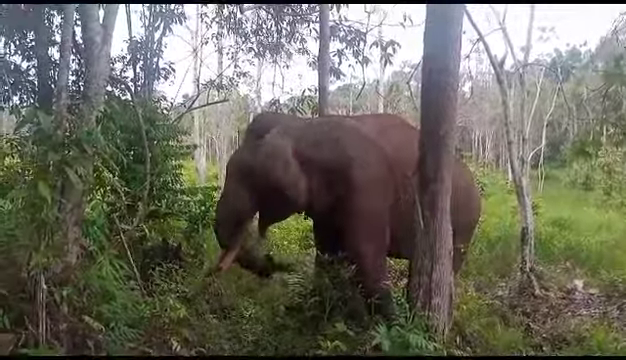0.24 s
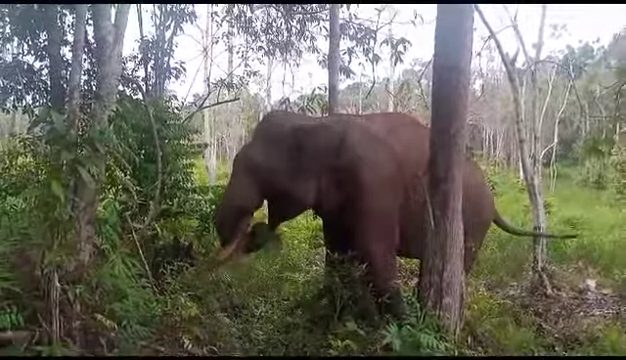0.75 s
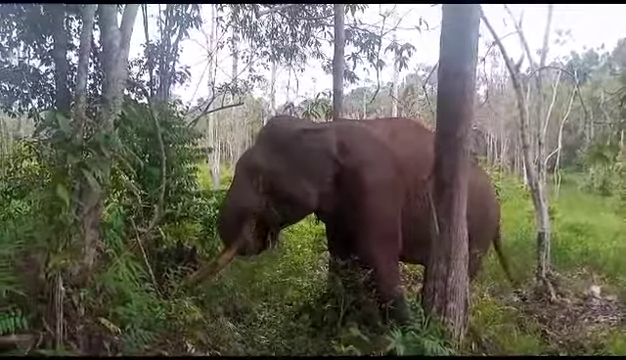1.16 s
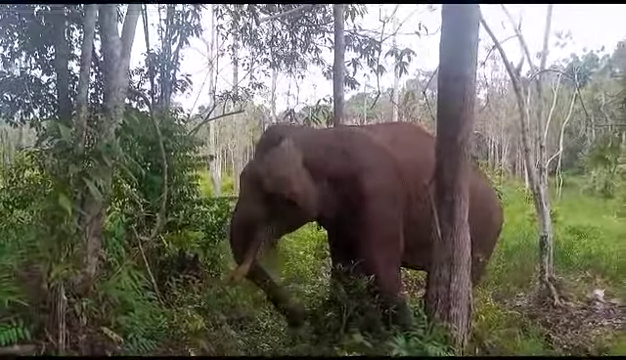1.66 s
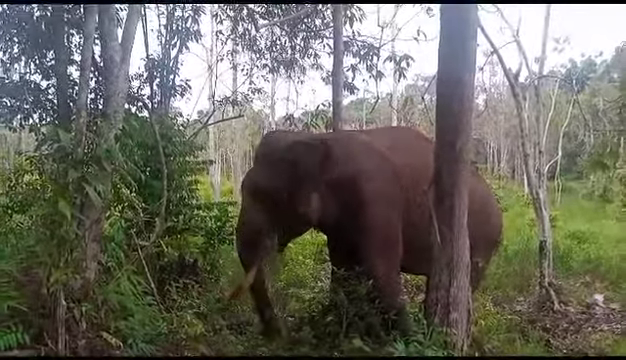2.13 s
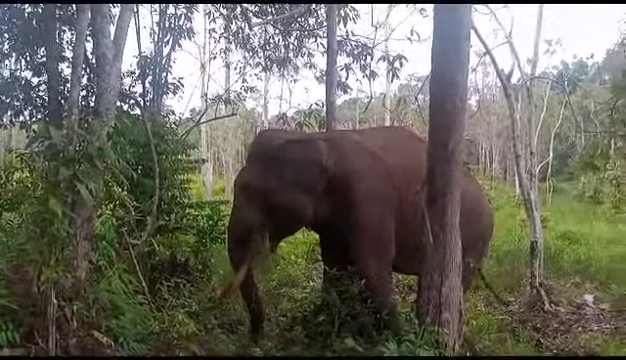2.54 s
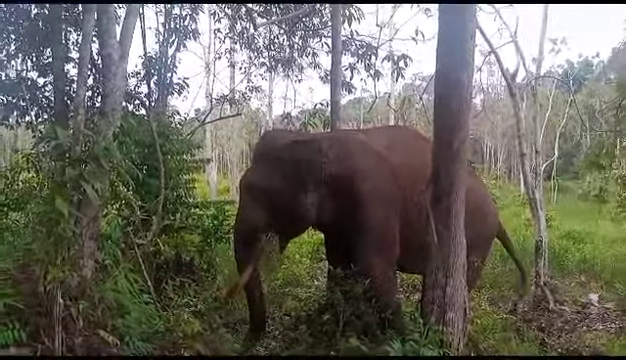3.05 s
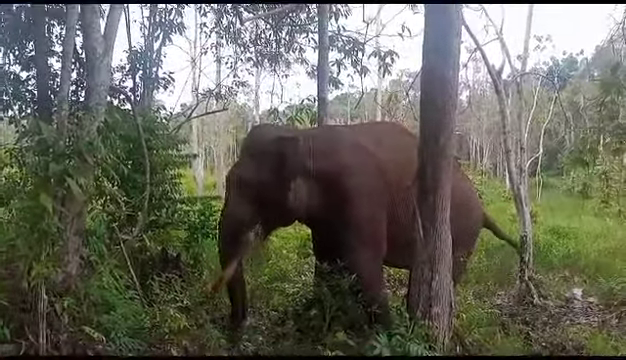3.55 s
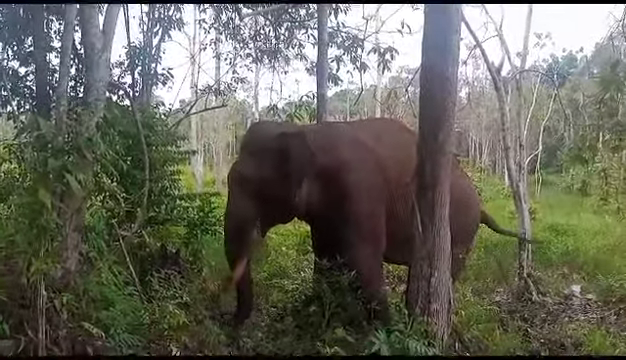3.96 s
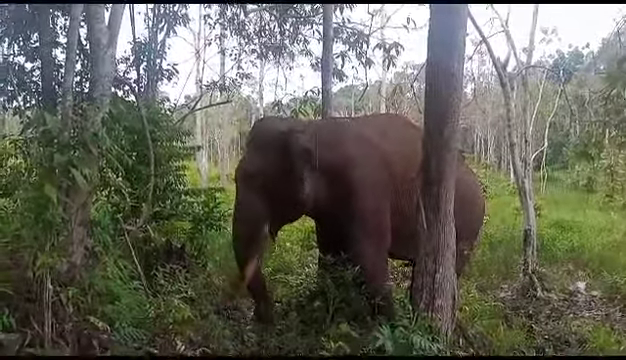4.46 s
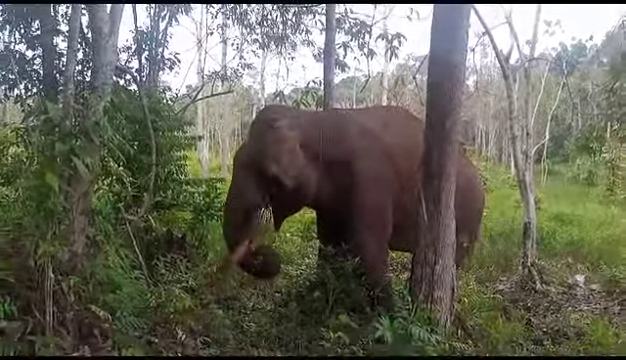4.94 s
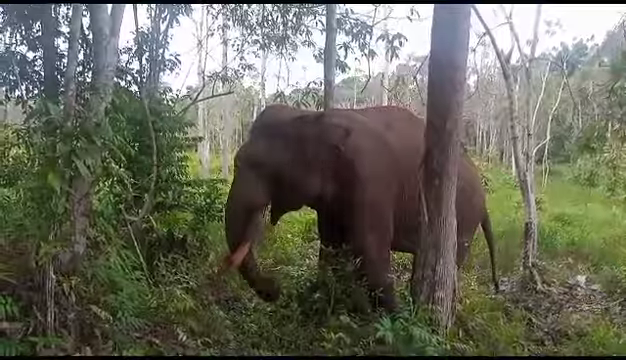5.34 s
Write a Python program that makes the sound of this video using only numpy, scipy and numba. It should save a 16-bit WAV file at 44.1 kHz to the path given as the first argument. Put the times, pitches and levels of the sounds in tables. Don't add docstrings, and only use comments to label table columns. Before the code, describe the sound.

Crisp ripping and snapping of plants in uneven pulls, strongest at the start, with dull thuds over a thin, high insect drone.

```python
import sys
import numpy as np
from scipy import signal
from scipy.fft import rfft, irfft, next_fast_len
from scipy.io import wavfile
from scipy.ndimage import uniform_filter1d
from numba import njit

SR = 44100
rng = np.random.default_rng(int(sys.argv[2]) if len(sys.argv) > 2 else 0)


def volts(x):
    e = np.asarray(x, float) / 20
    return 10 ** e


def log_audio(samples):
    frames = np.atleast_2d(samples).T
    limited = np.clip(frames, -1, 1)
    pcm = np.round(limited * 32767).astype(np.int16)
    wavfile.write(sys.argv[1], SR, pcm)


N = 247004
T = np.arange(N) / SR
COARSE_T = T[::32]

# (frequency [Hz], density [dB per Hz])
PLANT_SPECTRUM = [(24, -52), (40, -34), (147, -9), (268, -14.5), (401, -6), (489, -7.5), (555, -10.5),
                  (749, -9.5), (938, -12.5), (1590, 1), (2490, -5.5), (3910, -0.5), (6290, -2),
                  (13300, -7.5), (15900, 5.5)]


def level(x, db):
    return x * volts(db) / np.sqrt(np.mean(x ** 2))


def colour(x, points):
    hz, db = np.transpose(points)
    size = next_fast_len(len(x))
    f = np.maximum(np.arange(size // 2 + 1) * SR / size, 1)
    gain = volts(np.interp(np.log(f), np.log(hz), db))
    return irfft(rfft(x, size) * gain, size)[:len(x)]


def highpass(x, hz):
    return signal.sosfilt(signal.butter(2, hz, "highpass", fs=SR, output="sos"), x)


def walk(rate_hz):
    hold = int(SR / rate_hz)
    steps = np.repeat(rng.standard_normal(N // hold + 1), hold)
    return 1.3 * uniform_filter1d(uniform_filter1d(steps, hold), hold)[:N]


def tone(hz):
    return np.sqrt(2) * np.sin(2 * np.pi * np.cumsum(hz) / SR)


@njit
def grains(start, hz, t60_s, size):
    out = np.zeros(N)
    for g in range(len(start)):
        turn = np.exp(2j * np.pi * hz[g] / SR - np.log(1000) / (t60_s[g] * SR))
        z = size[g] + 0j
        for i in range(start[g], min(N, start[g] + int(t60_s[g] * SR) + 2)):
            out[i] += z.imag
            z *= turn
    return out


def crackle(count, cycles):
    when, pitch, strength = rng.random((count, 3)).T
    hz = 100 * 170 ** pitch
    size = volts(4 * np.log(1.01 - strength)) * hz / 1000
    return level(grains((when * N).astype(np.int64), hz, cycles / hz, size), 0)


def pull_shape(start_s, hold_s, rise_db_per_s, fall_db_per_s):
    before_s = np.maximum(start_s - COARSE_T, 0)
    after_s = np.maximum(COARSE_T - start_s - hold_s, 0)
    return -rise_db_per_s * before_s - fall_db_per_s * after_s


def rustle():
    # (time [s], level [dB], depth [dB])
    browse = [(0, -58.5, -5), (.5, -60, -4.5), (.95, -60, -6), (1.2, -73, -23), (1.6, -71.5, 2.5),
              (1.83, -75.5, 10.5), (2.2, -71, 6), (2.62, -72, 2), (2.73, -78.5, 8), (2.87, -80.5, 14),
              (2.92, -71, 5), (3.4, -63, -1), (3.68, -66, -4), (4.07, -64.5, 4), (4.33, -68, 4),
              (4.75, -63.5, -1), (5.05, -69, 10.5), (5.6, -62.5, -4)]
    # (start [s], hold [s], level [dB], dryness [dB], depth [dB])
    yanks = [(.07, 0.061, -46.5, 11, 3.5), (.262, 0.049, -66, 0, 14.5), (.41, .04, -63, -10, 5.5),
             (1.535, 0.017, -70, -3, -1), (4.36, 0.13, -67, -10, 16.5), (.712, 0.084, -60, 4, 7),
             (.805, 0.02, -62, 4, 13.5), (1.345, 0.032, -54, 6, 1), (.11, 0.027, -59, -5, 22),
             (3.9, .035, -60, -14, 11), (4.11, 0.02, -66, -8, 13), (4.25, 0.065, -64, -21, 6),
             (1.89, 0.015, -61.5, 7.5, -41), (2.56, 0.03, -63.5, 9, -7), (2.6, 0.024, -56.5, -16, -1.5),
             (2.886, .03, -76, -1, -19), (2.99, 0.043, -66, 5, -25), (3.74, 0.027, -60.5, -5, 2),
             (4.16, 0.041, -59, 2, 5.5), (4.366, 0.086, -50.5, -0.5, -5), (4.596, 0.029, -53, 4, 8.5),
             (4.79, 0.077, -64, -11, 13.5), (5.105, 0.029, -51.5, -4, -1.5), (5.15, 0.033, -53, -4, 0),
             (5.435, 0.016, -58.5, -4, -13)]
    # (start [s], hold [s], level [dB], dryness [dB], depth [dB])
    drags = [(.01, 0.047, -71.5, -1, 23.5), (.68, 0.016, -68, -15, 16.5), (1.03, 0.0055, -55, 6.5, -7),
             (1.08, 0.03, -66, 1, 18.5), (1.18, .02, -72, 12, -18), (1.3, 0.023, -60.5, 6, -12),
             (2.045, 0.011, -59, 5, -37), (2.235, .01, -64.5, 8.5, -31), (2.45, 0.0024, -63, 4, 0),
             (2.99, 0.09, -64.5, 7, -20), (3.07, 0.018, -62, 0, -2), (3.12, 0.034, -58.5, 2.5, 0),
             (3.18, .02, -62, 3, -6), (3.25, 0.023, -63.5, 6, 5.5), (3.49, 0.059, -62.5, -6, -5),
             (3.85, 0.015, -73, -5, 15.5), (3.98, 0.0031, -60.5, -14, 14), (4.49, 0.013, -64, 2, 14),
             (4.57, 0.016, -54.5, 7, 5), (5.09, 0.01, -57.5, -2, 0.5), (5.22, 0.012, -62, -4, -11),
             (5.59, .02, -75.5, 2, 23)]
    # (low edge [Hz], high edge [Hz])
    part_bands = [
        (60, 900),
        (900, 2700),
        (2700, 11000),
        (11000, 16000),
    ]
    # (pull level [dB], browsing level [dB], dryness share [ratio], depth share [ratio], haste of fall [ratio])
    part_rules = [
        (-19, -21.5, 0.24, 1, 2.3),
        (-10.5, -11.5, 0., 0.38, 1.46),
        (1, 1, 0.31, 0.0083, 0.78),
        (-9, -7, 1.3, 0.049, 1),
    ]
    pulls = [(yanks, 780, 204), (drags, 143, 150)]  # rise, fall [dB per s]

    raw = crackle(count=40000, cycles=17.7) + volts(3) * rng.standard_normal(N)
    raw = colour(raw * volts(1.5 * walk(70)), PLANT_SPECTRUM)
    browse_s, busy_db, busy_deep_db = np.transpose(browse)
    out = 0
    for band, (pull_db, browse_db, dry_share, deep_share, haste) in zip(part_bands, part_rules):
        part = signal.sosfilt(signal.butter(4, band, "bandpass", fs=SR, output="sos"), raw)
        steady_db = busy_db + browse_db + deep_share * busy_deep_db
        power = volts(np.interp(COARSE_T, browse_s, steady_db)) ** 2
        for rows, rise, fall in pulls:
            for start_s, hold_s, db, dry_db, deep_db in rows:
                peak_db = db + pull_db + dry_share * dry_db + deep_share * deep_db
                power = power + volts(peak_db + pull_shape(start_s, hold_s, rise, fall * haste)) ** 2
        out = out + level(part, 0) * np.interp(T, COARSE_T, np.sqrt(power))
    return out


def patchy(x):
    loud_db = 10 * np.log10(uniform_filter1d(x ** 2, size=2048) + 1e-12)
    flicker_share = np.interp(loud_db, [-55.5, -46.5], [1, 0.56])
    size = next_fast_len(N)
    spectrum = rfft(x, size)
    f = np.arange(size // 2 + 1) * SR / size
    out = 0
    for hz in 40 * 2 ** np.arange(0, 9, .25):
        near = (f > hz / 1.5) & (f < hz * 1.5)
        distance = np.abs(np.log(f[near] / hz))
        gain = np.zeros(len(f))
        gain[near] = volts(np.interp(distance, np.log([1, 1.09, 1.19, 1.5]), [0, -6, -30, -70]))
        depth_db = 3.0 if hz < 2700 else 1.6 if hz < 6500 else 0.5
        out = out + irfft(spectrum * gain, size)[:N] * volts(depth_db * flicker_share * walk(24))
    return out


def snaps():
    # (time [s], peak [dB], low part [dB], top part [dB], decay [ms])
    strands = [(0.0616, -14, -30.5, -10, 1.1), (0.063, -16.5, -18, 9, 2.3), (0.1298, -22, -7, 5, 3),
               (0.2716, -35.5, -2, 2, 4.2), (0.73, -30, -36, 8, 2), (0.77, -31, -15.5, -3.5, 5.3),
               (0.814, -39.5, -6.5, -6, 4), (0.877, -30.5, -21, 5, 1.7), (0.922, -40, -19, -10, 1.3),
               (0.9264, -33.5, -19, 0, 3.5), (1.0367, -44, -18, -5, 1.8), (1.351, -40, -28, -7, 1.8),
               (1.383, -45, -22, -9, 1.6), (2.6009, -35.5, -14.5, -23, 1.9), (2.887, -42, -42, -8, 3),
               (3.083, -37, -28, -10, 1.6), (3.1833, -31, -32, -4.5, 6.3), (3.2336, -40, -19, -12, 3.9),
               (3.4038, -43.5, -36, -11, 5), (3.7773, -37.5, -16.5, -8, 3.8), (3.8718, -40, -25, -22, 2.4),
               (3.99, -41, -36, -14, 1.9), (4.0012, -36.5, -16, -17, 3.5), (4.155, -37, -26, -4, 2.2),
               (4.1635, -23, -45, 2.5, 1.7), (4.168, -30.5, -43, 2, 5.3), (4.202, -44, -38, -16, 2.2),
               (4.365, -34.5, -26, -23, 2.8), (4.386, -38, -19, -12, 6.4), (4.4309, -34, -13.5, -10, 3.4),
               (4.4409, -30.5, -14, -10, 4), (4.4764, -32, -21, -6, 3), (4.5961, -29, -12, -8, 3.1),
               (4.6024, -29, -6.5, -2, 2.2), (4.609, -26, -18, 4, 4), (4.988, -44.5, -13, -14, 4),
               (5.023, -46, -27, -8, 1.5), (5.1126, -34, -15, -11.5, 2.5), (5.186, -35, -32, -10, 2.3),
               (5.4375, -38, -27, 5, 2.2),
               (0.084, -15, -32, 0, 1.5),
        (.0885, -20, -28, -2, 1.5),
        (.0915, -31, -22, -3, 1.5),
        (.0652, -32, -20, -3, 4),
        (.1352, -28, -11, 5, 1.5),
        (.144, -33, -17, -1, 2),
        (1.345, -45, -27, -6, 2),
        (1.362, -43, -26, -4, 2),
        (5.142, -42, -14, -8, 3),
        (5.161, -42, -16, -10, 2),
    ]
    # (time [s], peak [dB], low part [dB], top part [dB], decay [ms])
    rips = [
        (0.0562, -38, -26, 0, 5),
        (0.0804, -15.5, -38, -1, 4),
        (0.103, -23, -33, -2, 3),
        (0.1084, -25.5, -13, 0, 6.9),
        (0.1161, -22.5, -23, -0.5, 4.6),
        (0.127, -27.5, -24, -7.5, 23),
        (0.246, -28, -18, 6, 6.4),
        (0.722, -34.5, -36, 8, 12),
        (1.252, -46, -22, -5, 14),
        (3.736, -40.5, -17, -3, 7),
    ]
    kinds = [(5920, .00033, 0.6, 0.7, strands), (8900, .002, 5.5, 0.1, rips)]

    out = np.zeros(N + SR)
    t = T[:8192] - T[512]
    for hz, rise_s, hold_ms, sharp, rows in kinds:
        for s, db, low_db, top_db, decay_ms in rows:
            burst = rng.standard_normal(len(t)) * np.clip(t / rise_s, 0, 1)
            burst *= np.exp(-np.maximum(t * 1000 - hold_ms, 0) / decay_ms)
            burst *= 1 + sharp * np.exp(-np.abs(t) / .0005)
            tilt = [(2200, low_db + 12.5), (2900, low_db / 2 + 4), (3700, 0), (hz, 0), (hz, 2), (hz * 1.35, top_db)]
            crack = colour(colour(burst, PLANT_SPECTRUM), tilt)
            i = int((s + t[0]) * SR)
            out[i:i + len(t)] += crack * volts(db) / np.max(np.abs(crack))
    return out[:N]


def ring(s, db, push_ms, modes):
    hz, mode_db, t60_s = np.array(modes, float).reshape(-1, 3).T
    y = grains(np.zeros(len(hz), np.int64), hz, np.clip(t60_s, .01, .3), volts(mode_db))[:SR // 3]
    push = np.hanning(int(push_ms * SR / 1000) + 3)
    y = highpass(np.convolve(y, push), hz.min() * .8)
    y = highpass(y, hz.min() * .6)
    out, i = np.zeros(N + SR), int(s * SR)
    out[i:i + len(y)] = y * volts(db) / np.max(np.abs(y))
    return out[:N]


def knocks():
    # (time [s], peak [dB], pitch [Hz], t60 [s])
    hollow = [(0.086, -47.5, 900, 0.062), (0.108, -48.5, 360, 0.046), (0.124, -39, 826, 0.035),
              (0.272, -43, 1045, 0.024), (0.753, -47.5, 1160, 0.043), (0.916, -68, 1240, 0.068),
              (1.021, -60.5, 750, 0.11), (1.743, -74, 456, 0.13), (2.599, -67, 764, 0.1),
              (3.062, -65, 1190, 0.05), (3.156, -63, 587, 0.076), (3.231, -62, 402, 0.1),
              (3.528, -70, 1240, 0.067), (3.841, -61.5, 464, 0.13), (3.918, -57, 564, 0.092),
              (4.001, -62, 750, 0.046), (4.174, -59, 436, 0.15), (4.399, -57.5, 727, 0.16),
              (4.39, -50.5, 1614, 0.057), (4.56, -57, 740, .05), (4.788, -43.5, 1030, 0.045),
              (5.139, -67, 354, 0.063), (5.14, -63, 795, 0.12), (5.355, -57, 1680, 0.043),
              (.063, -35, 1995, 0.022), (3.78, -62, 1650, .04), (4.36, -60, 2500, .04)]
    # (time [s], peak [dB], pitch [Hz], t60 [s])
    thuds = [(0.021, -56, 80, 0.095), (0.114, -43.5, 149, 0.074), (0.198, -65, 72, 0.12),
             (0.525, -71, 91, 0.34), (0.661, -52, 92, 0.071), (0.769, -61.5, 137, 0.12),
             (0.866, -67, 63.6, 0.17), (1.0, -61, 257, 0.2), (1.051, -58.5, 404, 0.26),
             (1.36, -71, 300, 0.058), (1.386, -58.5, 192, 0.072), (1.899, -65, 74, 0.073),
             (2.029, -75, 67.5, 0.15), (2.299, -76, 61.9, 0.15), (2.469, -75, 61.9, 0.17),
             (2.737, -65.5, 63, 0.28), (3.718, -62.5, 112, 0.12), (4.101, -74, 151, 0.13),
             (4.456, -56, 65.4, 0.17), (4.499, -58, 143, 0.092), (4.679, -66, 75.4, 0.28),
             (4.839, -69, 65.3, 0.11), (5.547, -65, 182, 0.062)]
    # (frequency [Hz], level [dB], t60 [s])
    tusk_modes = [(227, 2, 0.087), (269, -12.5, 0.16), (316, -1, 0.029), (416, -7.5, 0.063),
                  (736, -8.5, 0.055), (1340, -22, 0.045), (1776, -13.5, 0.049)]
    # (frequency [Hz], level [dB], t60 [s])
    ground_modes = [(115, -3, 0.074), (88, -8, 0.11), (206, -10, 0.039), (312, -30, 0.033),
                    (478, -8.5, 0.042), (930, -8.5, 0.011)]

    out = np.zeros(N)
    for s, db, hz, t60_s in hollow + thuds:
        modes = [(hz, 0, t60_s), (hz * 5, -14, t60_s * 0.74), (hz * 0.659, -8, t60_s), (hz * 0.438, -13, t60_s)]
        out += ring(s, db, 500 / hz, modes)
    tusk = ring(1.0985, -35, push_ms=0.11, modes=tusk_modes)
    foot = ring(4.5965, -33.5, push_ms=0.7, modes=ground_modes)
    return out + tusk + foot


def creaks():
    # (start [s], length [s], pitch [Hz], level [dB])
    groans = [(3.457, 0.033, 1270, -72.5), (3.48, .075, 427, -79), (3.616, 0.056, 402, -84.5),
              (3.73, 0.096, 416, -78.5), (3.844, .07, 481, -76), (4.246, 0.075, 1362, -73.5),
              (4.26, .06, 638, -78), (4.988, .035, 820, -79), (5.084, 0.11, 775, -75),
              (5.11, .065, 390, -76), (5.14, .04, 1560, -75), (5.23, 0.097, 430, -81),
              (5.28, .12, 790, -79.5), (5.44, 0.058, 970, -78), (5.47, 0.085, 794, -78),
              (5.5, .04, 1287, -84), (0.995, .08, 260, -75), (1.027, 0.042, 410, -69),
              (1.28, .06, 1970, -80), (1.717, .06, 450, -88), (.63, 0.025, 1400, -70),
              (.75, 0.025, 440, -59), (.8, 0.022, 1896, -64), (0.801, 0.022, 1600, -65),
              (1.66, 0.045, 2010, -76), (5.017, 0.018, 472, -68.5), (5.354, 0.017, 1178, -59),
              (5.585, .022, 440, -63), (1.373, 0.048, 329, -78), (3.69, .1, 129.7, -76),
              (4.47, .04, 696, -80), (0.263, 0.028, 796, -67.5), (2.8, 0.051, 2020, -84),
              (3.55, .06, 420, -91)]
    out, flicker = 0, volts(4.5 * walk(70))
    for s, length_s, hz, db in groans:
        u = np.clip((T - s) / length_s, 0, 1)
        out = out + volts(db) * np.sin(np.pi * u) ** .5 * tone(hz * (1 + .04 * (.5 - u)))
    return out * flicker


def cicadas():
    # (time [s], pitch [Hz])
    pitch_tracks = [
        [(.8, 3052), (1.3, 3030), (2.3, 3003), (3.5, 2988), (4.4, 2975), (5.6, 2957)],
        [(.2, 2905), (1.0, 2980), (1.5, 3008), (2.0, 3035), (2.7, 3078), (3.1, 3080)],
        [(1.0, 2910), (1.5, 2938), (2.0, 2957), (2.4, 2948)],
        [(5.3, 3084), (5.6, 3081)],
        [(0, 2995), (.5, 3025), (.9, 3052), (2.0, 3035), (2.7, 3078), (3.1, 3072), (3.7, 3045), (4.4, 3040),
         (5.3, 3075), (5.6, 3084)],
        [(.8, 3052), (1.3, 3030), (2.3, 3003), (3.5, 2988), (4.4, 2975), (5.6, 2957)],
    ]
    # (time [s], level [dB])
    level_tracks = [
        [(.8, -80), (2.1, -83), (2.5, -79.5), (3.4, -78), (3.7, -89), (4.6, -73), (5.6, -88)],
        [(.2, -84), (1.2, -81), (1.4, -72.5), (1.72, -70.5), (1.78, -88), (1.9, -75), (2.3, -73.5), (2.7, -75),
         (3.1, -84)],
        [(1.2, -86), (1.45, -74.5), (1.85, -75), (1.95, -78), (2.4, -89)],
        [(5.3, -71), (5.6, -71)],
        [(0, -61), (.3, -62.5), (.7, -59.5), (1.0, -70), (1.3, -99), (2.3, -74), (2.75, -69.5), (3.3, -64),
         (3.7, -67.5), (4.0, -67.5), (4.4, -66), (4.6, -64.5), (4.95, -64), (5.35, -62), (5.6, -82)],
        [(.8, -66), (1.4, -75.5), (2.3, -72.5), (2.5, -88), (3.4, -90), (3.7, -72), (4.3, -69), (4.8, -76),
         (5.6, -69)],
    ]
    # (partial 1 [dB], partial 2 [dB], partial 4 [dB], wander [share of pitch], throb depth [0-1])
    voices = [
        (1.5, -6, 2.5, 0.00042, 0.13),
        (0, -26, 1, 0.00156, 0.24),
        (2, -24, 0.5, 0.0011, 0.11),
        (-5, -1, 0.5, 0.00066, .1),
        (-16.5, -1.5, -28, 0.00402, 0.37),
        (-21, -1.5, -17, 0.00034, 0.14),
    ]
    throb_hz, fade_s = 42, .1

    out = volts(-82 + 1.9 * walk(3.2)) * tone(5250 * (1 + 0.02 * walk(400)))
    for pitch, rows, (first_db, second_db, fourth_db, wander, throb) in zip(pitch_tracks, level_tracks, voices):
        s, db = np.transpose(rows)
        hz = np.interp(T, *np.transpose(pitch)) * (1 + wander * walk(90))
        fade = np.clip(np.minimum(T - s[0], s[-1] + fade_s - T) / fade_s, 0, 1)
        strength = fade * volts(np.interp(T, s, db))
        strength *= 1 + throb * tone(throb_hz * (1 + .3 * walk(30))) / np.sqrt(2)
        flicker_db = 2.8 if wander > .003 else 2.2
        for k, partial_db in enumerate([first_db, second_db, fourth_db - 6, fourth_db]):
            out += strength * volts(partial_db + flicker_db * walk(45)) * tone((k + 1) * hz)
    return out


def bird():
    # (start [s], length [s], pitch [Hz], level [dB], hoarseness [0-1])
    chirps = [(1.663, .009, 4050, -56, .3), (1.664, .008, 3750, -58, .3), (1.665, .006, 6400, -57, .3),
              (1.575, .07, 3900, -74, .4), (4.65, .085, 4330, -55, .65), (4.652, .06, 4200, -55, .55),
              (4.69, .05, 3950, -61, .7), (4.77, .07, 4500, -61, .75), (4.765, .12, 4200, -61, .75),
              (4.96, .05, 4000, -64, .6), (4.938, .025, 4400, -60, .25), (5.27, .058, 3620, -57, .15),
              (5.325, .025, 3610, -64, .1), (5.43, .05, 3610, -68, .2)]
    fall_hz = 1300
    out = 0
    for s, length_s, hz, db, hoarse in chirps:
        u = np.clip((T - s) / length_s, 0, 1)
        voice = 1 - .8 * hoarse + .8 * hoarse * walk(1300)
        out = out + volts(db) * voice * np.sin(np.pi * u) ** .5 * tone(hz - fall_hz * hoarse ** 2 * u)
    return out


def forest():
    # (frequency [Hz], density [dB per Hz])
    insect_spectrum = [(24, -31), (40, -16), (454, -29), (1120, -39), (1370, -32.5), (2750, -35.5),
                       (3050, -13), (3500, -34.5), (4300, -39), (5000, -29.5), (5600, -16), (6450, -14),
                       (8940, -2), (10400, -11.5), (12100, -14.5), (12800, -26), (14100, -23), (15900, -12)]
    far = colour(rng.standard_normal(N), insect_spectrum)
    far = colour(far, [(5000, 0.5), (6500, 0), (11500, -10.5), (12800, -3.5)])
    return level(far * volts(.7 * walk(1.5)), -59)


def undergrowth_tail(x):
    t60_s, gap_s = 0.12, .004
    t = T[:SR // 4]
    tail = rng.standard_normal(len(t)) * np.exp(-np.log(1000) * t / t60_s) * (t > gap_s)
    tail = volts(-14) * tail / np.sqrt(np.sum(tail ** 2))
    return signal.fftconvolve(x, tail)[:N]


def scene():
    near = patchy(rustle() + forest()) + snaps() + knocks() + bird()
    return (near + undergrowth_tail(near) + cicadas() + creaks())[None]


def band_limit(x):
    return signal.sosfilt(signal.butter(12, 17160, fs=SR, output="sos"), x)


def record(dry):
    # (frequency [Hz], gain [dB])
    mic_response = [(2150, 0), (2320, -5.5), (2450, -5.5), (2600, -5.5), (2750, -1.5), (12200, 2),
                    (12900, -3.5), (13900, 1.5), (14700, 5), (15700, 5)]
    # (frequency [Hz], gain [dB])
    band_edge = [(15850, 0), (16050, -60)]
    heard = highpass(highpass(dry[0], 72), 42)
    heard = colour(colour(heard, mic_response), band_edge)
    return band_limit(heard[None])


dry = scene()
out = record(dry)
log_audio(out)
```